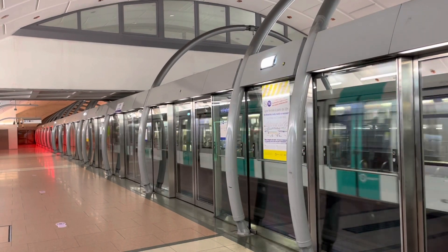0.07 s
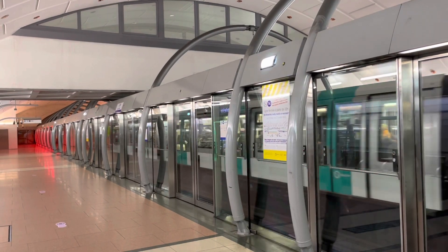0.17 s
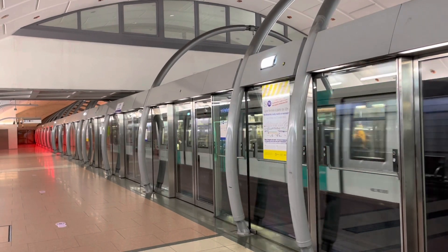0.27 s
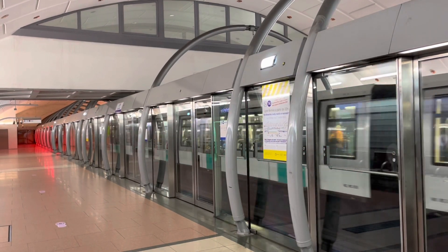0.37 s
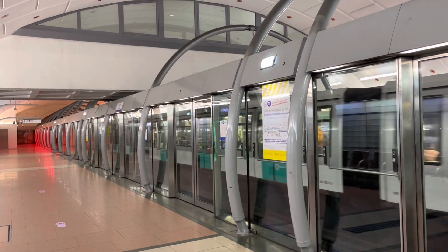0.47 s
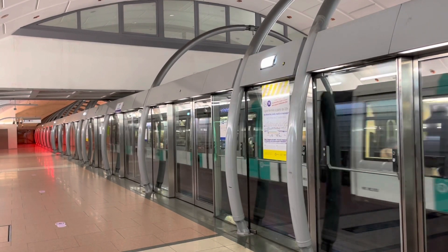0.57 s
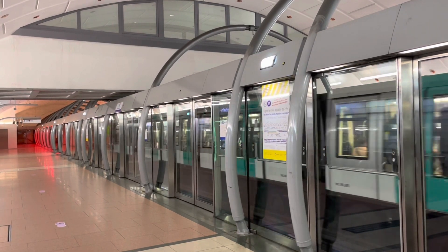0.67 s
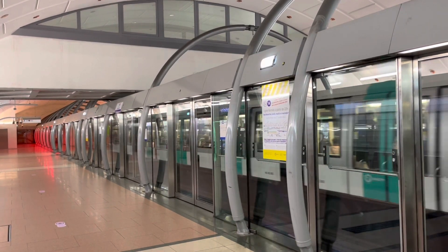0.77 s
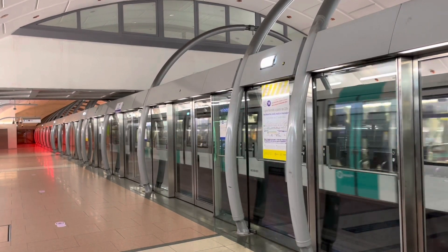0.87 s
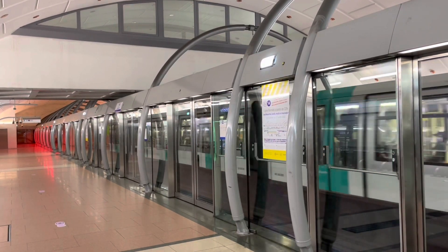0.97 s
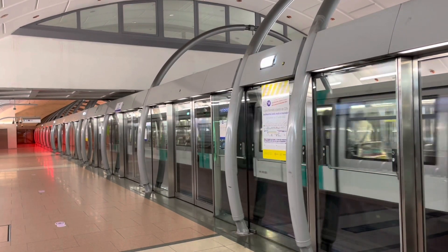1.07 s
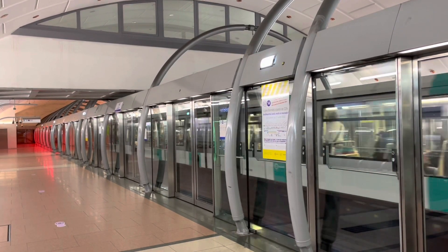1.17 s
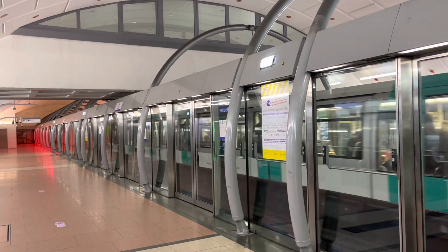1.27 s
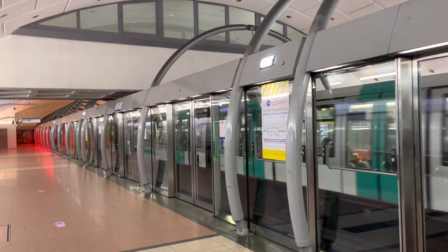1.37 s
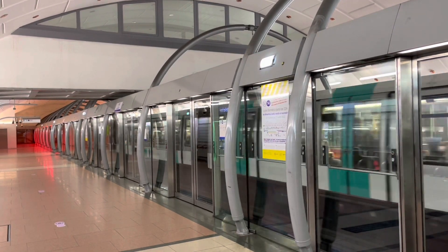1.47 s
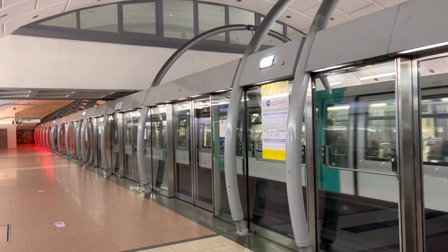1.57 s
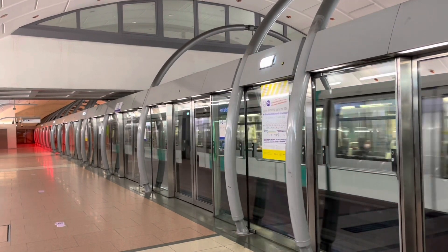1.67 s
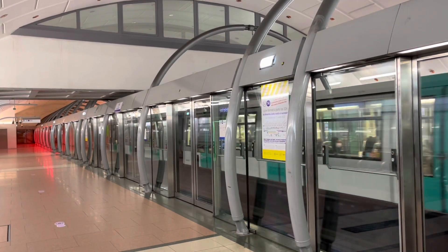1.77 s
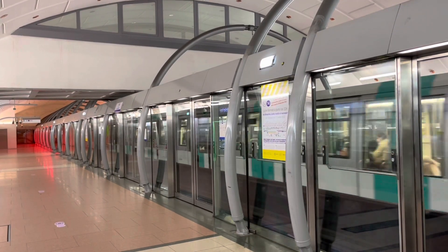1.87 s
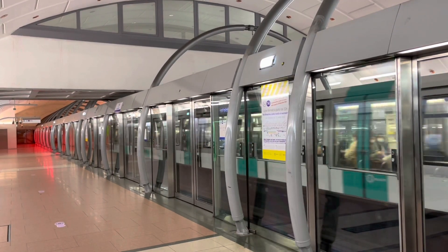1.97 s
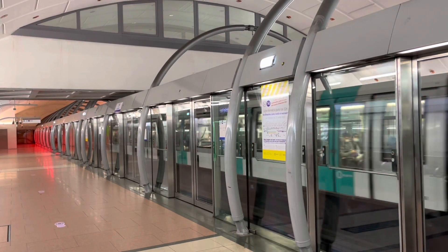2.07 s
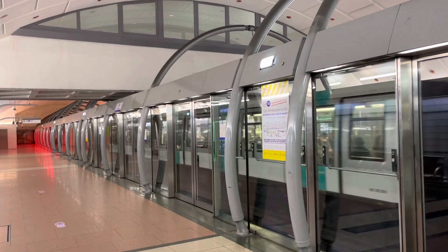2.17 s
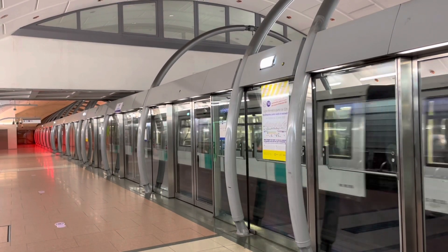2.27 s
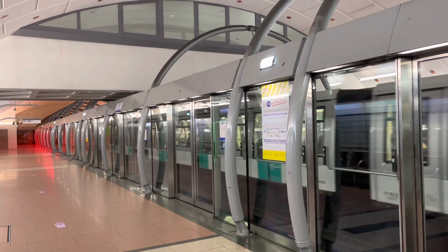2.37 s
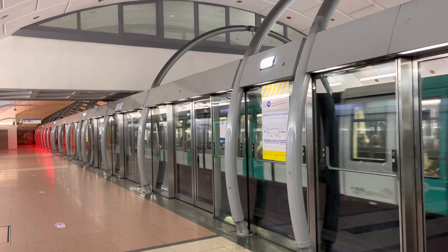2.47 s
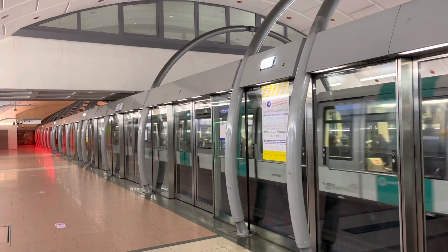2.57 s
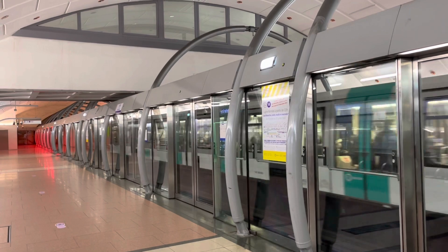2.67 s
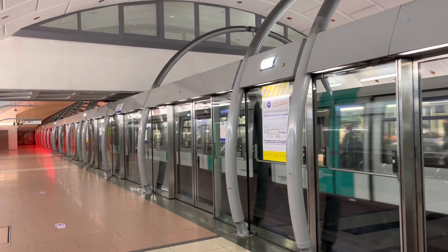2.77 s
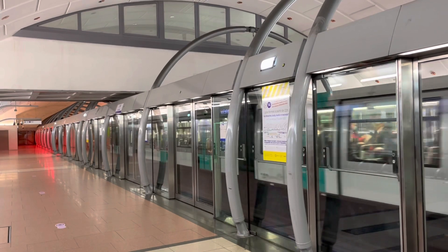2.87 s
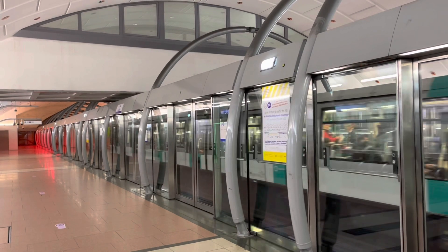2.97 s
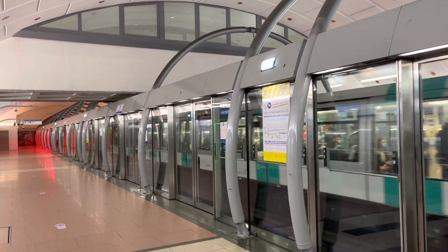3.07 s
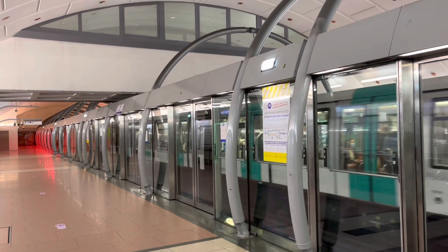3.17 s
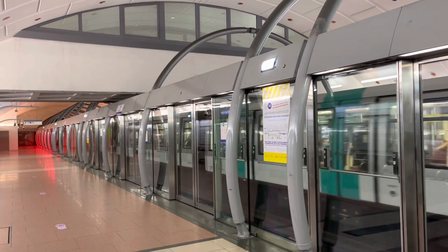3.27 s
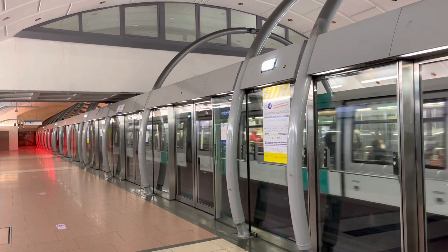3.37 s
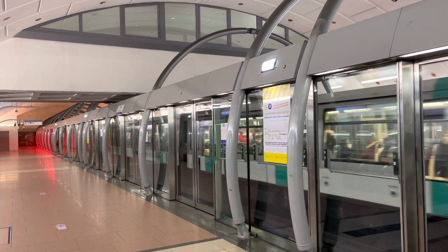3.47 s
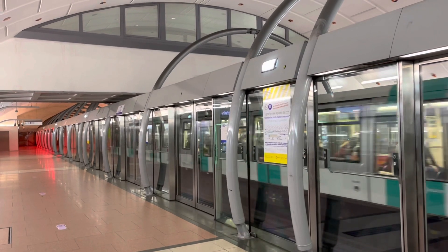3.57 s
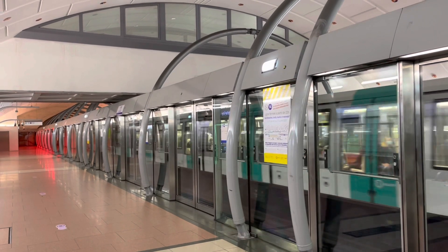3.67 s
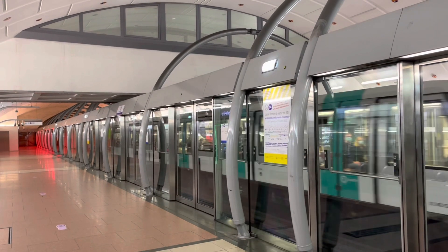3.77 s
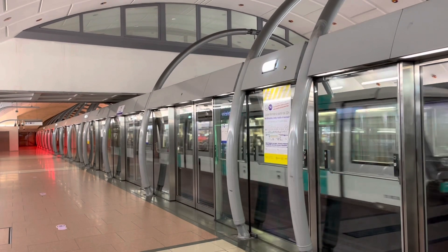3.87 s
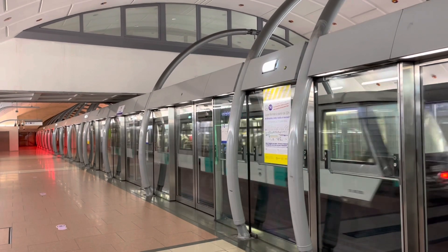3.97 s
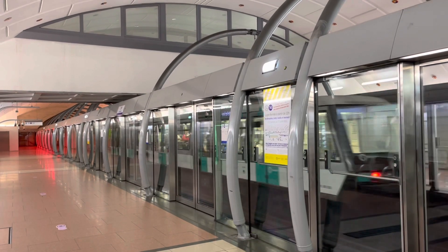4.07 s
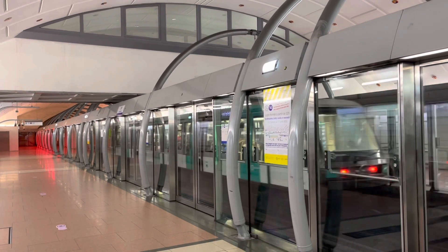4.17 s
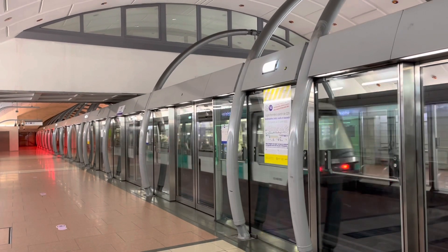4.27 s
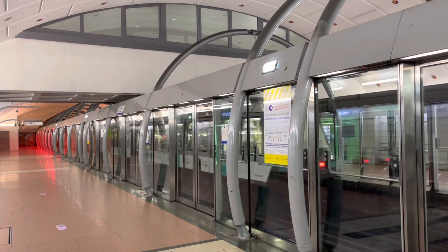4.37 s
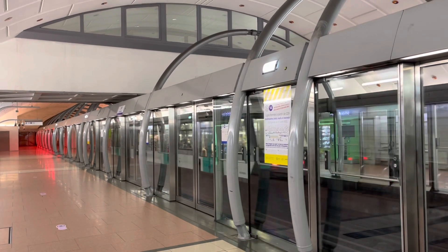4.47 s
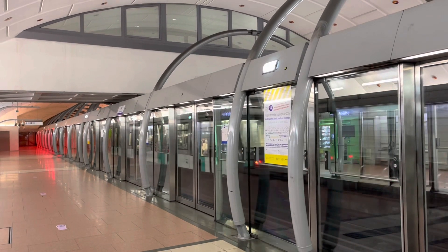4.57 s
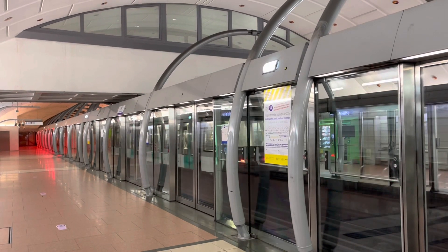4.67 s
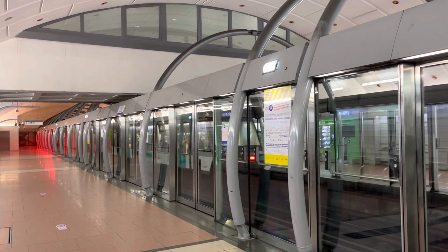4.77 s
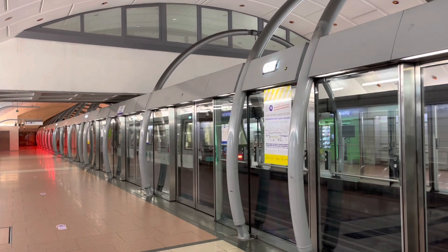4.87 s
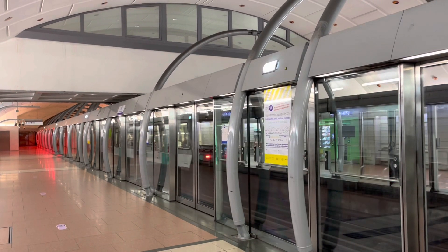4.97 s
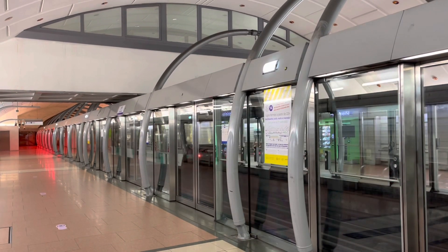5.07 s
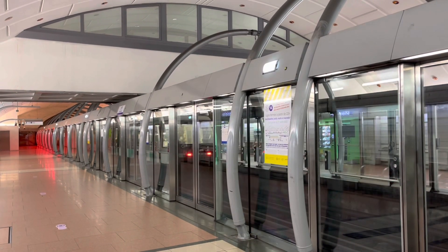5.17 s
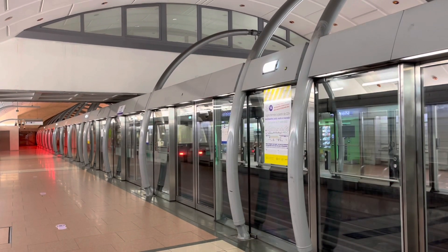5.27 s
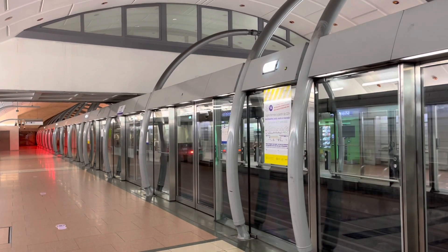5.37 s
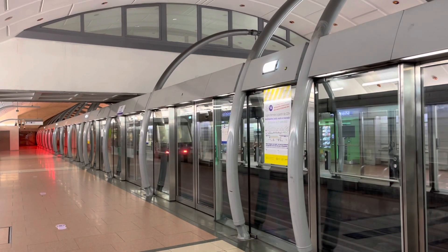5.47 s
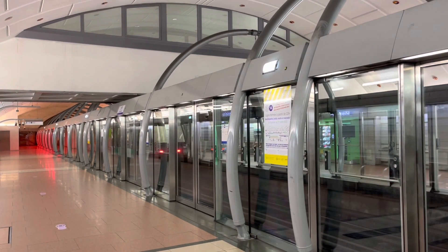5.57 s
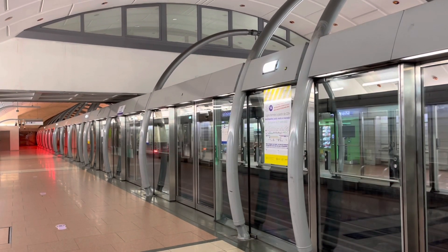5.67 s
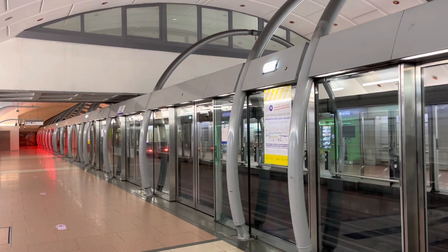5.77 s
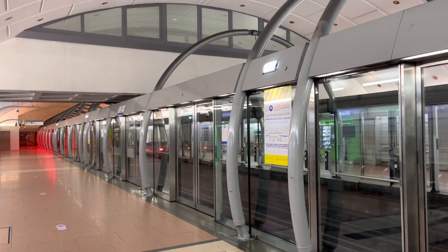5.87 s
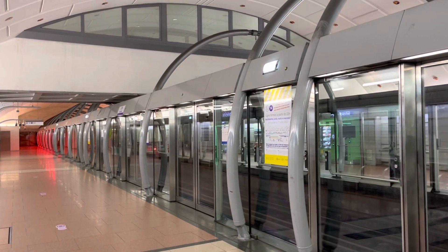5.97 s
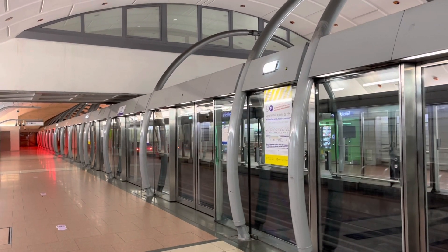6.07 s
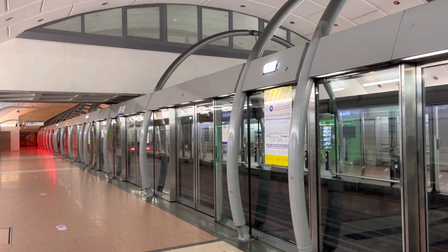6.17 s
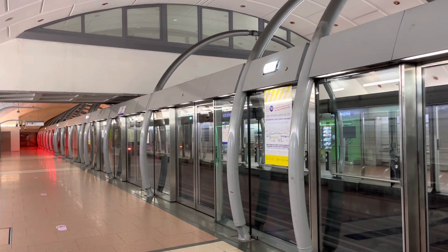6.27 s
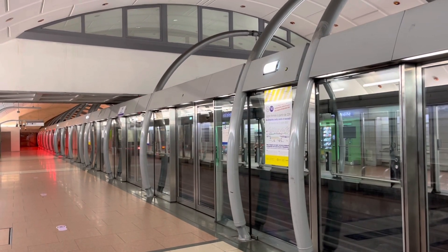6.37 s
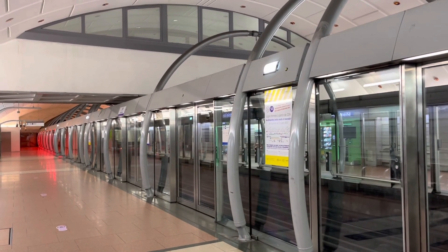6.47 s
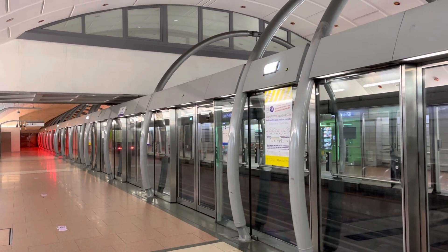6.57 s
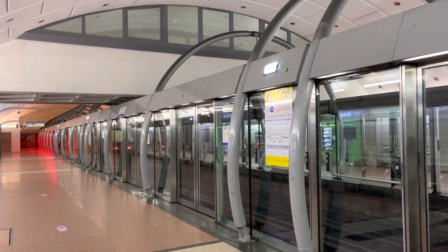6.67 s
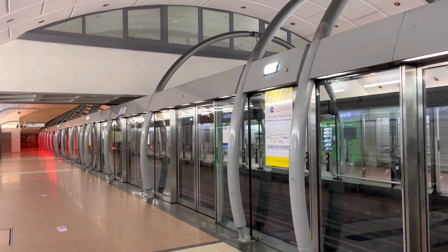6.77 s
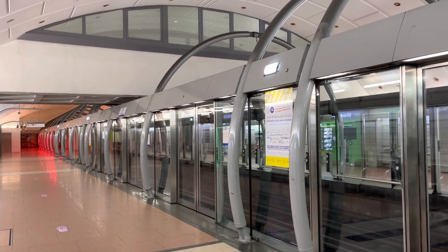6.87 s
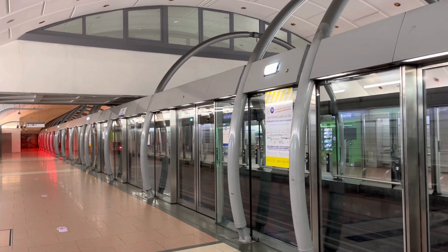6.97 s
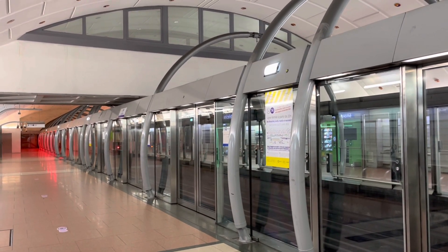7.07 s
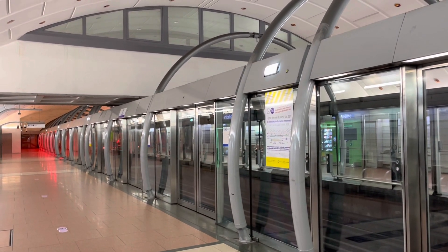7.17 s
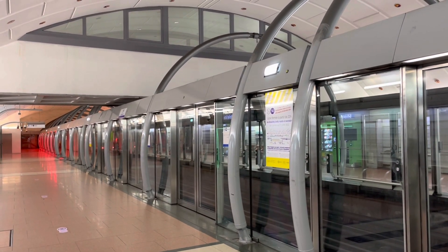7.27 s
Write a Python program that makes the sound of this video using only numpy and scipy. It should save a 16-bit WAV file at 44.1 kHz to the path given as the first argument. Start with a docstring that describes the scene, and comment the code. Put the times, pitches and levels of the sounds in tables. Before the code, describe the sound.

In a vaulted underground station, a rubber-tyred metro train already passes close behind platform doors. A low electric hum-like whine throbs about ten times a second and creeps upward, over deep rumble and broad tyre roar with fine hiss. Small scuffs and one soft bump break the flow. After the last car passes, around four seconds, the rolling softens and dulls while the whine continues. A fixed stereo microphone stands on the platform; bass is narrow, mids wide.

```python
"""The motors of a rubber-tyred metro train whine as it accelerates out of a vaulted station, behind platform doors.
The whine is one rising tone that flutters and throbs, pulled in pitch by each throb; the hall smears its echo.
Gear tones rise as multiples of it; noise makes the tyres' rumble, hiss and roar, duller as the train draws away.
The tunnel booms at one low note; tonal patches and surges, scuffs and one soft bump make the rolling uneven.
The stereo image is narrow in the bass and wider through the middle of the range."""
import sys
import numpy as np
from scipy import signal
from scipy.fft import rfft, irfft, next_fast_len
from scipy.io import wavfile

SR = 44100
rng = np.random.default_rng(int(sys.argv[2]) if len(sys.argv) > 2 else 0)


def wav_out(sig):
    """Save sig, one row per channel (or a flat mono array), as 16-bit PCM at SR to the path in sys.argv[1]."""
    wavfile.write(sys.argv[1], SR, np.round(np.clip(np.atleast_2d(sig).T, -1, 1) * 32767).astype(np.int16))


N = 322150

# Motor speed. Each row: time in seconds, whine pitch in Hz before the throbs pull it.
MOTOR_SPEED = [(0, 201), (1.1, 210), (1.9, 225), (3.2, 236), (3.5, 244), (5.3, 260), (6.4, 275), (7.3, 280)]
# Whine between throbs. Each row: time in seconds, level in dB before the trim in motors().
WHINE_FLOOR = [(0, -35), (1.4, -34), (2.3, -32.5), (4, -33.5), (4.7, -37), (5.5, -40.5), (6.2, -37.5),
               (7.3, -36)]
# Throbs as the motors fall in step, about ten a second. Each row: time in seconds, level in dB before
# the trim in motors(), length at half height in seconds, pitch shift in Hz (averaged by power).
WHINE_THROBS = [(0.067, -23.5, 0.105, 6), (0.309, -22.5, 0.079, 11), (0.35, -25, 0.016, 10.5),
                (0.417, -19, 0.1, 4), (0.504, -20, 0.04, 5), (0.555, -17.5, 0.05, 23.5),
                (0.606, -23, 0.071, 16), (0.688, -19, 0.058, 8), (0.752, -24.5, 0.037, 8),
                (0.824, -17, 0.023, 10), (0.868, -21, 0.026, 14.5), (0.967, -23.0, 0.11, 8),
                (1.051, -18, 0.058, 0), (1.147, -22.0, 0.051, 21.5), (1.23, -19.5, 0.096, -1),
                (1.334, -20, 0.06, 12), (1.474, -22, 0.11, 4), (1.55, -19.5, 0.043, -1.5),
                (1.589, -26.5, 0.023, 1), (1.676, -29.5, 0.12, -1), (1.727, -26.5, 0.035, -4.5),
                (1.787, -19.5, 0.04, 6.5), (1.865, -20.5, 0.086, 3), (1.986, -18.5, 0.041, 4),
                (2.064, -22.5, 0.027, 5.5), (2.108, -25.5, 0.072, 4), (2.274, -18, 0.14, 3.5),
                (2.39, -20.0, 0.087, 2), (2.45, -15, 0.025, 10), (2.541, -18, 0.031, -0.5),
                (2.59, -20.5, 0.087, 0), (2.756, -18.5, 0.097, 2), (2.83, -17.5, 0.095, 1),
                (2.997, -21.5, 0.092, 5), (3.119, -16.0, 0.092, 4), (3.196, -19.5, 0.066, 0.5),
                (3.299, -17.0, 0.099, -1), (3.415, -15, 0.061, 2.5), (3.479, -20, 0.034, 4),
                (3.525, -27, 0.023, 2), (3.624, -19, 0.064, -4), (3.714, -15.5, 0.048, -3),
                (3.787, -19, 0.025, -2), (3.854, -18, 0.092, 0.5), (3.943, -17, 0.031, -2),
                (3.992, -15, 0.031, -1.5), (4.07, -27.0, 0.098, 0), (4.154, -17.5, 0.039, -4),
                (4.205, -15.5, 0.028, 1.5), (4.327, -20, 0.069, 1.5), (4.415, -20, 0.064, 0),
                (4.546, -20, 0.057, 0), (4.764, -25, 0.086, 2), (4.936, -24.5, 0.098, 5),
                (5.069, -22, 0.055, 7), (5.139, -20.5, 0.091, 0), (5.234, -17.5, 0.049, 4),
                (5.36, -26.5, 0.073, 7), (5.435, -17, 0.043, 1), (5.503, -28.5, 0.031, 13.5),
                (5.713, -20.5, 0.078, 0.5), (5.899, -23, 0.11, 5), (6.047, -21.5, 0.045, -3.5),
                (6.188, -26.5, 0.042, 8.5), (6.301, -18.5, 0.04, 4.5), (6.392, -25.5, 0.061, 5),
                (6.486, -23, 0.11, -0.5), (6.612, -24.5, 0.13, 3.5), (6.712, -29, 0.1, -6),
                (6.878, -17.5, 0.12, -3), (7.021, -18.5, 0.061, 4), (7.099, -23.5, 0.13, 1.5),
                (7.191, -18.5, 0.029, -2.5), (7.269, -18, 0.069, 6.5)]
# Flutter of the whine, least in the middle as the last cars pass. Each row: time in seconds, depth 0-1.
WHINE_FLUTTER = [(0, 0.32), (1.8, .28), (2.6, 0.13), (4.2, 0.1), (5.5, 0.32), (7.3, 0.2)]
# The whine as the hall returns it. Each row: time in seconds, level in dB before the mid-side mix.
HALL_RETURN = [(0, -28), (1.5, -28.5), (3.2, -30.5), (4.6, -32.5), (6, -29), (7.3, -30)]
# Motor and gear tones. Each row: multiple of the whine pitch, dB alongside, dB far off.
GEAR_ORDERS = [(0.49, -38, -48), (0.68, -45.5, -51), (1.15, -27, -40.5), (1.35, -32.5, -44),
               (1.69, -33.5, -49), (1.99, -32.5, -45), (2.33, -39, -42.5), (3, -39.5, -45.5),
               (3.5, -42, -49.5), (4.67, -39.5, -48), (5.83, -36, -47.5), (7, -54.5, -48.5),
               (8.17, -44.5, -48)]
# Brief tonal surges, low ones in the roar and higher gear tones. Each row: time in seconds,
# multiple of the whine pitch, level in dB, length at half height in seconds.
TONAL_SURGES = [(0.184, 1.62, -27.5, 0.063), (.3, 7.9, -36, .4), (.3, 4.6, -39, .2),
                (.372, 1.93, -22.5, 0.057), (.45, 5.8, -46, 0.31), (0.594, 1.88, -27, 0.041),
                (0.984, 1.38, -28, 0.12), (.98, 1.8, -25, .06), (1.35, 7.03, -36, .3),
                (1.45, 4.78, -40, 0.29), (1.867, 1.68, -27, 0.053), (2.007, 1.68, -28, 0.055),
                (2.101, 7, -41, 0.23), (2.3, 1.43, -30, 0.073), (2.62, 1.37, -27, .08),
                (2.701, 7, -37, 0.17), (3.05, 4, -40, 0.43), (3.516, 7, -35, 0.17),
                (3.821, 4.67, -37, 0.15), (4.85, 2.36, -40, 0.36), (4.85, 8.2, -46, 0.34),
                (5.098, 5.85, -42, 0.37), (5.701, 2.36, -42, 0.75), (6.094, 1.39, -36.5, 0.33),
                (6.249, 8.05, -50, .45), (6.747, 5.8, -43, 0.17), (6.899, 1.36, -33, 0.067),
                (7.244, 1.36, -34.5, 0.053)]
# How far the train has left. Each row: time in seconds, share 0-1.
DEPARTURE = [(0, 0), (1.5, 0.24), (3, 0.5), (4.5, 0.65), (6, 1), (7.3, 0.91)]
# Low rumble of the wheels. Each row: time in seconds, level in dB before the trim in tyres().
RUMBLE_LEVELS = [(0, -35.5), (1.6, -33.5), (2.6, -34), (4, -38), (5.8, -39), (6.6, -36), (7.3, -38.5)]
# Rolling. Each row: time in seconds, roar in dB before trims in tyres() and roar_patches(), hiss in dB.
ROLLING_LEVELS = [(0, -26.5, -50.5), (.7, -26, -50), (1.5, -27, -50.5), (2.3, -27, -49.5), (3, -28, -50.5),
                  (3.7, -29, -50.5), (4.1, -30.5, -52), (4.6, -31, -54.5), (5.2, -31, -56),
                  (6.2, -31.5, -59), (7.3, -33.5, -61)]
# Noise colours of the rolling, near and far. Each row: frequency in Hz, relative density in dB.
RUMBLE_COLOUR = [(20, -27), (35, -25), (50, 4), (62, 1), (76, 4.5), (105, 3), (135, 2.5), (170, -0.5),
                 (230, 2.5), (320, -4), (500, -4), (900, -73)]
NEAR_ROAR_COLOUR = [(100, -26), (200, -6.5), (320, -6), (430, -8), (600, -11), (950, -10), (1750, -13.5),
                    (2600, -11.5), (3500, -15), (5100, -21), (6000, -27), (7300, -28), (9000, -59),
                    (12000, -51)]
FAR_ROAR_COLOUR = [(100, -20), (200, -4.5), (310, 1), (430, -14.5), (620, -7), (760, -11), (1100, -11),
                   (1750, -16), (2400, -15.5), (3400, -17), (5100, -25.5), (7300, -32), (9000, -43),
                   (12000, -63)]
HISS_COLOUR = [(3000, -26), (7500, 14), (9000, 8), (10000, 7), (11000, 7.5), (12500, 4), (14200, -3.5)]
# Trackway and door resonances in the roar. Each row: centre in Hz, width in Hz, relative lift in dB.
TRACKWAY_RESONANCES = [(371, 23, 4.5), (922, 54, 3.5), (1506, 230, 3), (2570, 32, 0.5)]
# Tunnel resonance, dipping as the last car passes and swelling behind it.
# Each row: time in seconds, level in dB before trim and heaving in tunnel().
TUNNEL_BOOM = [(0, -35), (.35, -46), (.6, -43), (1.6, -43), (2.2, -36), (2.7, -51), (3, -39), (3.25, -45),
               (3.55, -36.5), (4.15, -57), (4.6, -48), (5.1, -35), (5.6, -35), (6.1, -35), (6.8, -45),
               (7.3, -43)]
# Scuffs and hisses of the running gear. Each row: time in seconds, centre in Hz, width in Hz,
# level in dB, length at half height in seconds.
SCUFFS = [(.3, 2900, 1200, -32, .04), (.72, 5300, 700, -41, .04), (1.04, 3050, 1500, -33, .05),
          (1.1, 5160, 600, -36, 0.034), (1.248, 5115, 700, -40, 0.034), (1.92, 2316, 1200, -39, .04),
          (2.03, 5220, 700, -45, 0.043), (2.055, 6900, 1400, -47, .02), (2.75, 1400, 1100, -30, 0.094),
          (3.02, 3400, 892, -37, 0.058), (3.35, 4950, 500, -45, .1), (3.463, 3490, 900, -33, 0.037),
          (3.6, 4985, 499.4, -47, 0.11), (3.77, 4655, 1500, -38, .04), (3.83, 1963, 700, -33, 0.023),
          (4.35, 2100, 500, -33, 0.029), (4.51, 2515, 898, -37, .04), (5.25, 4180, 1006, -44, .06),
          (5.317, 5317, 600, -47, .035), (5.99, 2390, 601, -38, .06), (6.149, 2810, 902, -48, .06)]
# Colour of a soft wheel bump. Each row: frequency in Hz, relative density in dB.
BUMP_COLOUR = [(150, -8), (380, 2), (650, 9), (1000, -3), (2500, -30)]
# Stereo image: how alike left and right are, their phase and level difference, by frequency.
# Each row: frequency in Hz, likeness 0-1, left lead in radians, left-minus-right level in dB.
STEREO_IMAGE = [(60, 1, 0, 0), (110, .98, 0, 0), (300, .83, .1, 0), (520, .38, 0, 1.5), (1100, .2, .2, .5),
                (1400, .2, -1.5, -1), (1620, .3, -2.7, -2.5), (1700, .62, .4, 3.5), (2400, .55, .6, 2),
                (3000, .5, .9, 3), (5000, .33, .5, 8), (7000, .55, -1.7, 2), (7750, .995, -3.14, 0),
                (9200, .995, -3.14, 0), (9800, .85, -6.1, 0), (12000, .95, -6.28, 0)]

BOOM_HZ, CUTOFF_HZ = 46.1, 14300
BUMP_S, BUMP_DB, BUMP_LENGTH_S = 1.7, -25.5, 0.025
TIME = np.arange(N) / SR
FFT_SIZE = next_fast_len(N)
BINS = np.maximum(np.arange(FFT_SIZE // 2 + 1) * SR / FFT_SIZE, 1)  # Hz, kept above 0 for the logarithm


def from_db(db):
    """Decibels to gain."""
    return 10 ** (np.asarray(db) / 20)


def rms_one(x):
    """Scale to unit power."""
    return x / np.sqrt(np.mean(np.abs(x) ** 2) + 1e-20)


def in_time(rows):
    """Each column of a curve at every sample."""
    s, *columns = np.transpose(rows)
    return [np.interp(TIME, s, c) for c in columns]


def at_hz(rows, hz):
    """Each column of a table, read on a log-frequency axis."""
    points, *columns = np.transpose(rows)
    return [np.interp(np.log(hz), np.log(points), c) for c in columns]


def wander(width_hz, span=slice(None), size=2048):
    """Slow complex noise with a bell-shaped spectrum; rms about 1 over the whole length, 0.7 in its real part."""
    hz = np.fft.fftfreq(size, TIME[-1] / size)
    bell = np.exp(-.5 * (hz / width_hz) ** 2)
    white = rng.standard_normal(size) + 1j * rng.standard_normal(size)
    slow = np.fft.ifft(np.fft.fft(white) * bell)
    return np.interp(TIME[span], np.linspace(0, TIME[-1], size), rms_one(slow))


def swell(s, length):
    """A smooth rise and fall around time s, of the given length at half height: its samples and its shape."""
    span = slice(*np.searchsorted(TIME, [s - length, s + length]))
    return span, np.cos(np.pi / 2 * (TIME[span] - s) / length) ** 2


def in_stereo(common, apart, hz):
    """Two unrelated complex signals become left and right, with the likeness, phase and balance set at hz."""
    alike, lead, pan_db = at_hz(STEREO_IMAGE, hz)
    mid, side = np.sqrt(1 + alike) * common, np.sqrt(1 - alike) * apart
    turn = np.exp(.5j * lead) * from_db(pan_db / 2)
    return np.array([(mid + side) * turn, (mid - side) / turn])


def hall_noise(spectrum, lift_db=0):
    """Diffuse stereo noise of a given colour, as the hall spreads it; rms 1 in the middle."""
    colour = from_db(at_hz(spectrum, BINS)[0] + lift_db)
    common, apart = rfft(rng.standard_normal((2, FFT_SIZE))) * colour
    pair = irfft(in_stereo(common, apart, BINS), FFT_SIZE)[:, :N]
    return pair / np.std(pair.mean(axis=0))


def throbbing():
    """Strength and pitch shift of the whine: a steady part and the throbs, added as power."""
    power, pull = from_db(in_time(WHINE_FLOOR)[0]) ** 2, np.zeros(N)
    for s, db, length, shift_hz in WHINE_THROBS:
        span, window = swell(s, length)
        throb = (from_db(db) * window) ** 2
        power[span] += throb
        pull[span] += shift_hz * throb
    return np.sqrt(power), pull / power


def motors(angle, level_db=-0.45, waver_hz=1.0, flutter_hz=22):
    """The fluttering whine: each throb pulls it to the pitch of the motors that are loudest just then."""
    strength, shift_hz = throbbing()
    detune = 2 * np.pi * np.cumsum(shift_hz + waver_hz * wander(5.9).real) / SR
    flutter = 1 + in_time(WHINE_FLUTTER)[0] * wander(flutter_hz)
    tone = flutter * np.exp(1j * (angle + detune))
    return from_db(level_db) * np.sqrt(2) * strength * tone.real


def motor_echo(angle, spread_hz=13, mid_db=-2.0, side_db=-5.0):
    """Reflections from ahead and behind carry different Doppler shifts and smear the whine."""
    mid = from_db(mid_db) * wander(spread_hz)
    side = from_db(side_db) * wander(spread_hz)
    smeared = np.array([mid + side, mid - side]) * np.exp(1j * angle)
    return from_db(in_time(HALL_RETURN)[0]) * np.sqrt(2) * smeared.real


def speed_tone(order, angle, pitch, span=slice(None), steady=0.0):
    """A tone locked to motor speed; the Doppler smear of many wheelsets widens with order, less if steady."""
    width_hz = 4 + 5 * order
    smear = np.sqrt(1 - steady)
    common = np.sqrt(steady) + smear * wander(width_hz, span)
    apart = smear * wander(width_hz, span)
    pair = in_stereo(common, apart, order * pitch[span].mean())
    return (pair * np.exp(1j * order * angle[span])).real


def gears(angle, pitch, gone, patchy_db=0.5):
    """Weaker tones that come and go as the bogies pass."""
    out = np.zeros((2, N))
    for order, near_db, far_db in GEAR_ORDERS:
        level_db = near_db + gone * (far_db - near_db) + patchy_db * wander(5.0).real
        out += from_db(level_db) * speed_tone(order, angle, pitch)
    return out


def tyres(gone, rumble_db=3.5, roar_db=2.0, flutter_db=0.5):
    """Rubber on the runways: a low rumble, a roar that dulls with distance, and a thin hiss."""
    rumble, = in_time(RUMBLE_LEVELS)
    roar, hiss = in_time(ROLLING_LEVELS)
    ringing = sum(db / (1 + (2 * (BINS - hz) / width) ** 2) for hz, width, db in TRACKWAY_RESONANCES)
    near = np.sqrt(1 - gone) * hall_noise(NEAR_ROAR_COLOUR, ringing)
    far = np.sqrt(gone) * hall_noise(FAR_ROAR_COLOUR, ringing)
    roar_gain = from_db(roar + roar_db + flutter_db * wander(25).real)
    low = from_db(rumble + rumble_db) * hall_noise(RUMBLE_COLOUR)
    return low + roar_gain * (near + far) + from_db(hiss) * hall_noise(HISS_COLOUR)


def tunnel(level_db=-2.5, waver_hz=1.0, heave_db=-5.0, heave_hz=4.0):
    """The air in the tunnel booms at one note, unsteady in pitch and strength."""
    pitch = BOOM_HZ + waver_hz * wander(1.18).real
    level = in_time(TUNNEL_BOOM)[0] + level_db + heave_db * wander(heave_hz).real
    return from_db(level) * np.sqrt(2) * np.sin(2 * np.pi * np.cumsum(pitch) / SR)


def roar_patches(level_db=1.5, spread_db=6.0, low_hz=900, high_hz=5500, length=0.054, count=200):
    """Brief tonal patches at random pitches, times and stereo leads make the roar uneven."""
    out, roar_db = np.zeros((2, N)), in_time(ROLLING_LEVELS)[0]
    for when, height, size, lead in rng.random((count, 4)):
        span, window = swell(when * TIME[-1], length)
        hz = low_hz * (high_hz / low_hz) ** height
        colour_db = at_hz(NEAR_ROAR_COLOUR, hz)[0]
        chance_db = spread_db * (2 * size - 1.5)
        gain = from_db(roar_db[span] + colour_db + level_db + chance_db) * np.sqrt(2)
        phase = np.pi * np.array([[0], [lead - .5]])  # left, right
        out[:, span] += gain * window * np.sin(2 * np.pi * hz * TIME[span] + phase)
    return out


def tonal_surges(angle, pitch):
    """Brief tonal surges, low ones in the roar and higher gear tones, at multiples of the whine pitch."""
    out = np.zeros((2, N))
    for s, order, db, length in TONAL_SURGES:
        span, window = swell(s, length)
        out[:, span] += from_db(db) * window * speed_tone(order, angle, pitch, span, steady=0.68)
    return out


def scuffs_and_bump():
    """Short scuffs, each noise in its own band, stand out of the rolling, and once a wheel bumps softly."""
    out, white = np.zeros((2, N)), hall_noise([(100, 0), (10000, 0)])
    for s, hz, width_hz, db, length in SCUFFS:
        span, window = swell(s, length)
        edges = [hz - width_hz / 2, hz + width_hz / 2]
        band = signal.butter(2, edges, "band", fs=SR, output="sos")
        out[:, span] += from_db(db) * window * rms_one(signal.sosfilt(band, white[:, span]))
    span, window = swell(BUMP_S, BUMP_LENGTH_S)
    out[:, span] += from_db(BUMP_DB) * window * hall_noise(BUMP_COLOUR)[:, span]
    return out


def scene():
    """Motor speed drives the whine, gear tones and surges; distance colours the gears and tyres."""
    pitch, = in_time(MOTOR_SPEED)
    gone, = in_time(DEPARTURE)
    angle = 2 * np.pi * np.cumsum(pitch) / SR
    tones = motors(angle) + motor_echo(angle) + gears(angle, pitch, gone)
    rolling = tyres(gone) + tunnel() + roar_patches()
    return tones + rolling + tonal_surges(angle, pitch) + scuffs_and_bump()


def record(dry):
    """The top is cut steeply above CUTOFF_HZ."""
    return signal.sosfilt(signal.ellip(10, .1, 80, CUTOFF_HZ, fs=SR, output="sos"), dry)


dry = scene()
out = record(dry)
wav_out(out)
```